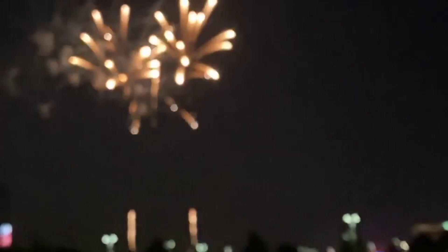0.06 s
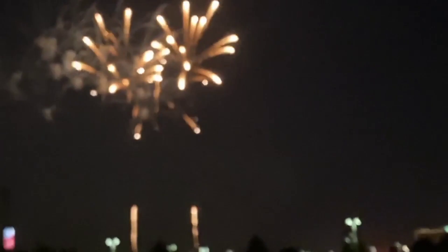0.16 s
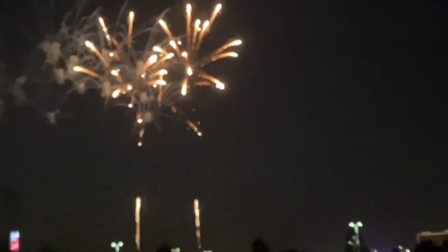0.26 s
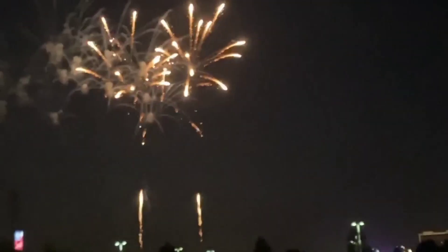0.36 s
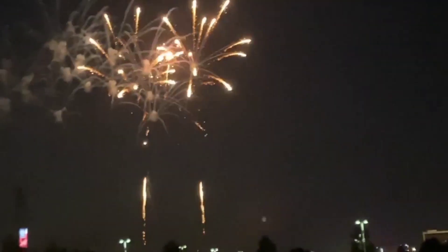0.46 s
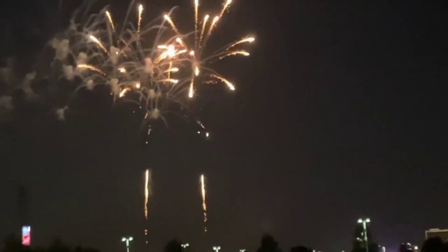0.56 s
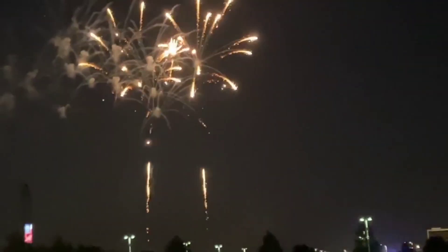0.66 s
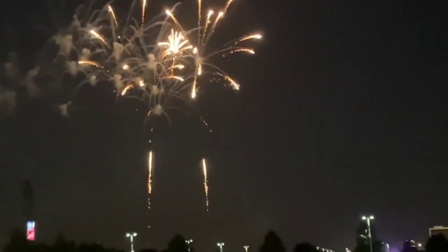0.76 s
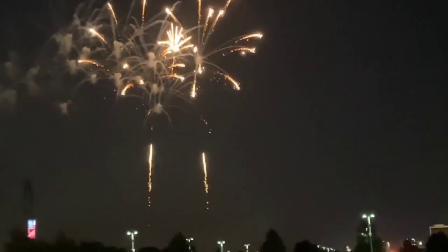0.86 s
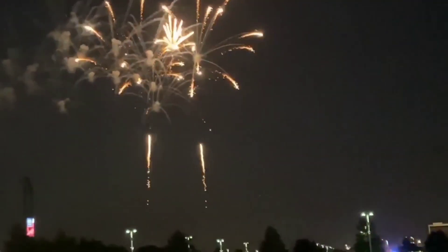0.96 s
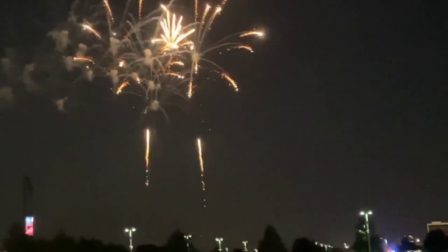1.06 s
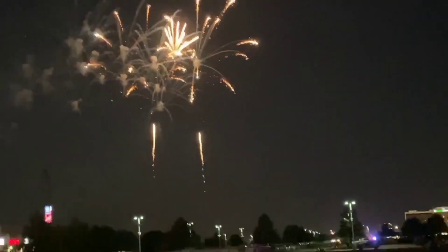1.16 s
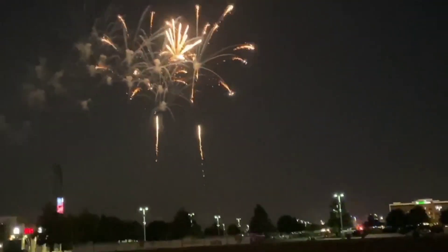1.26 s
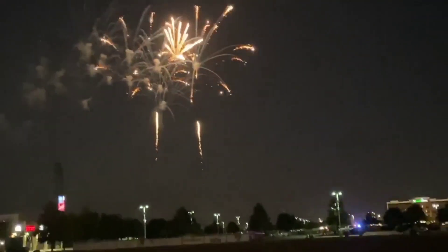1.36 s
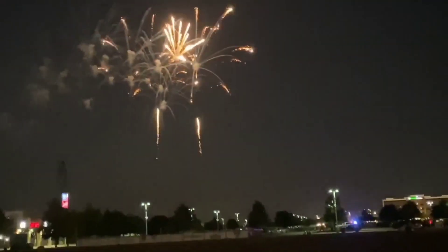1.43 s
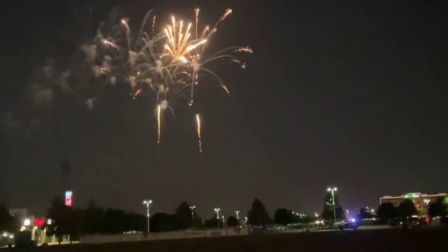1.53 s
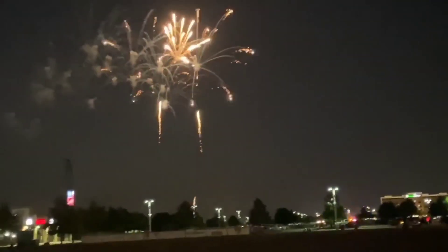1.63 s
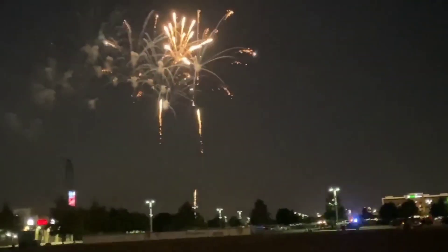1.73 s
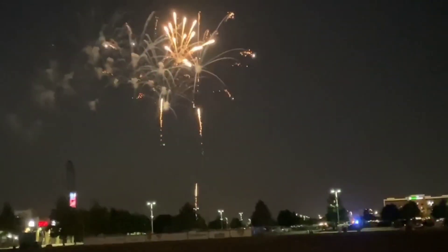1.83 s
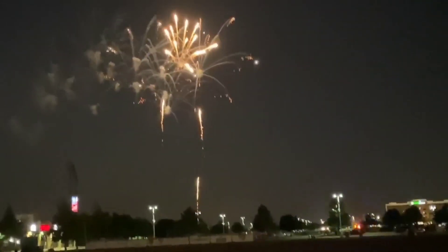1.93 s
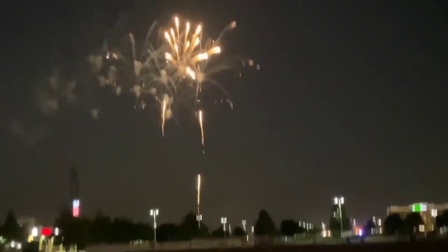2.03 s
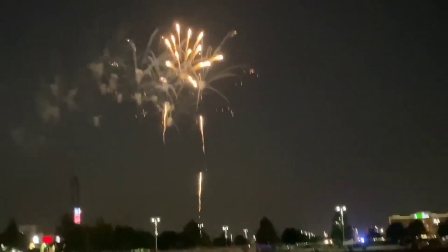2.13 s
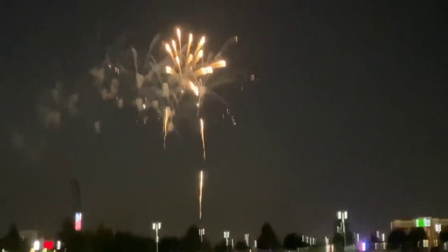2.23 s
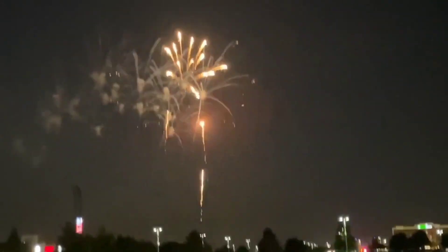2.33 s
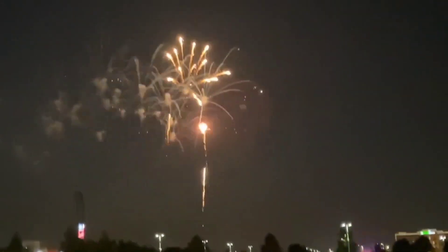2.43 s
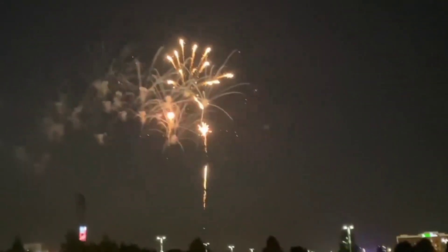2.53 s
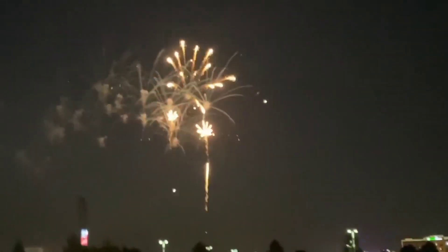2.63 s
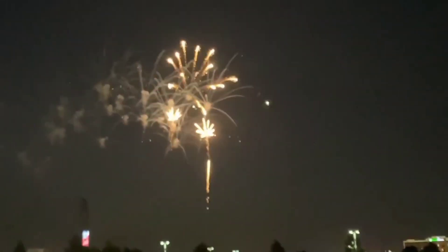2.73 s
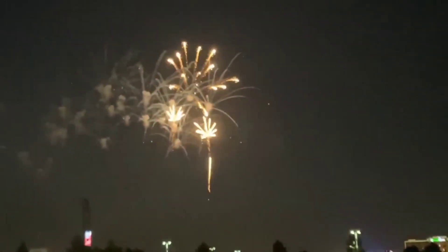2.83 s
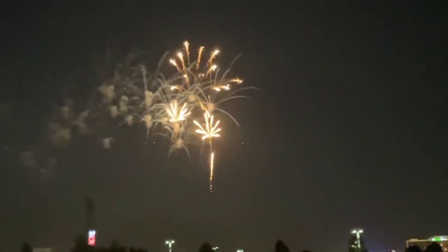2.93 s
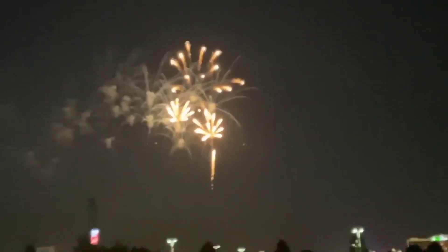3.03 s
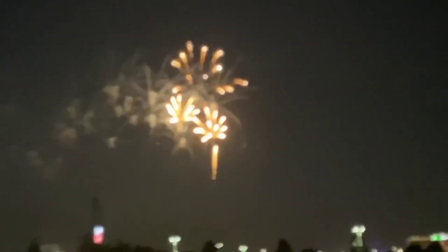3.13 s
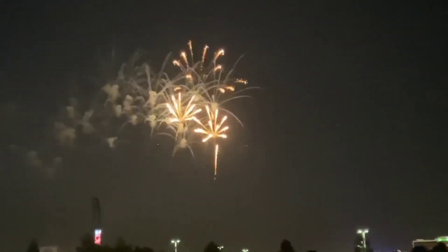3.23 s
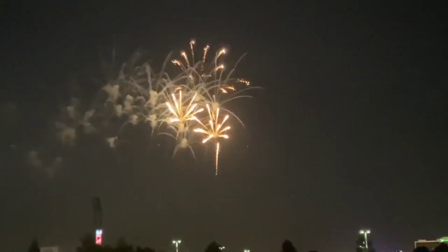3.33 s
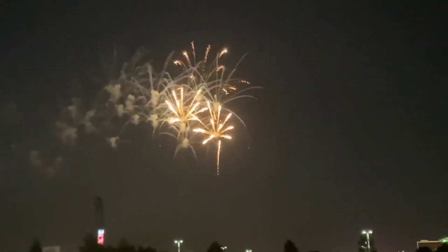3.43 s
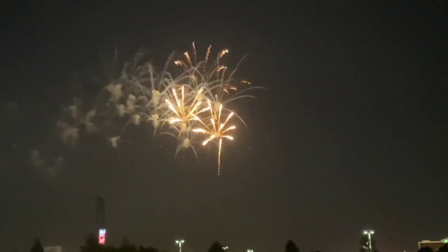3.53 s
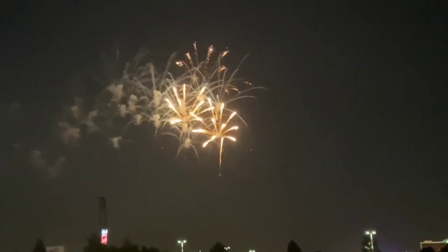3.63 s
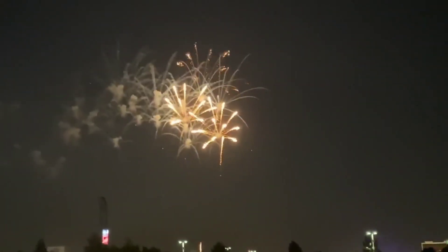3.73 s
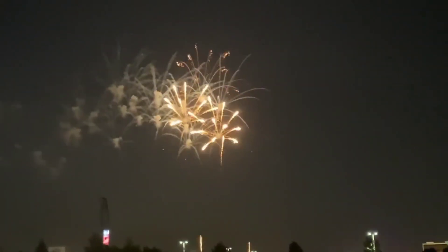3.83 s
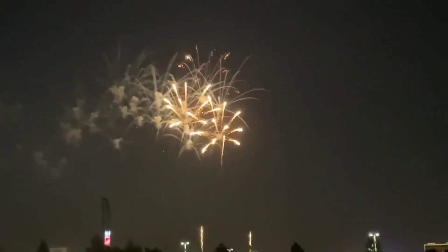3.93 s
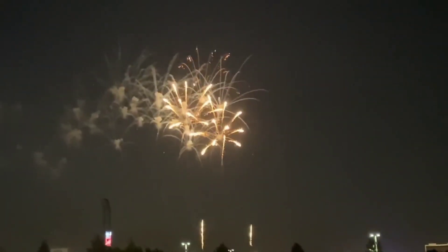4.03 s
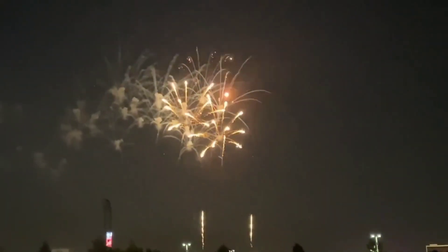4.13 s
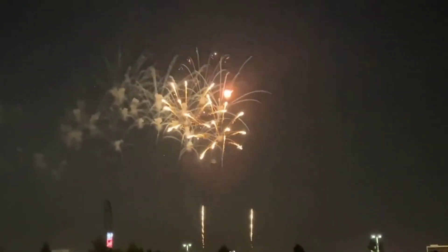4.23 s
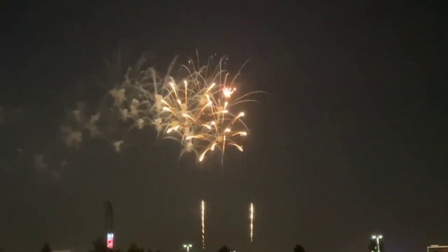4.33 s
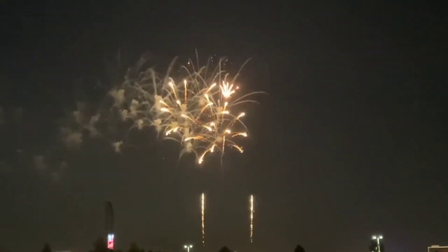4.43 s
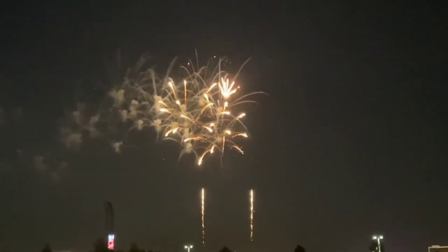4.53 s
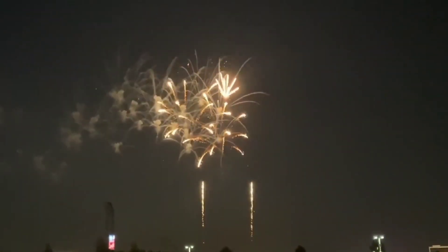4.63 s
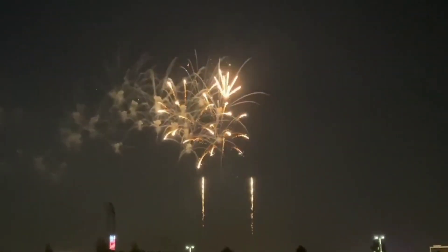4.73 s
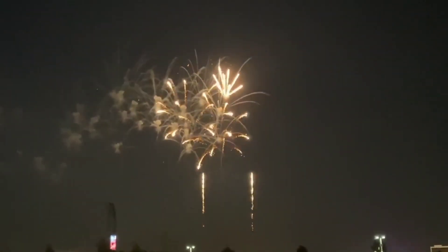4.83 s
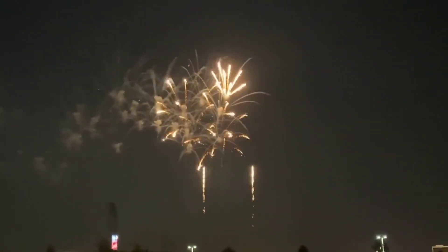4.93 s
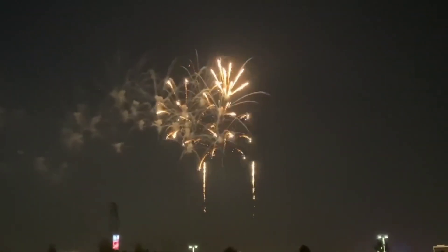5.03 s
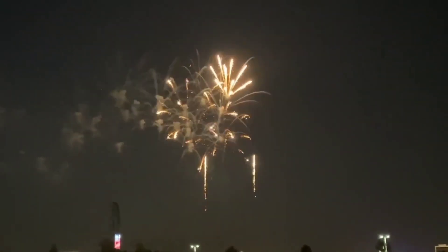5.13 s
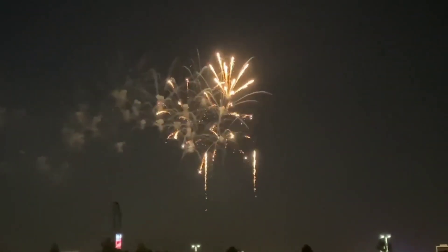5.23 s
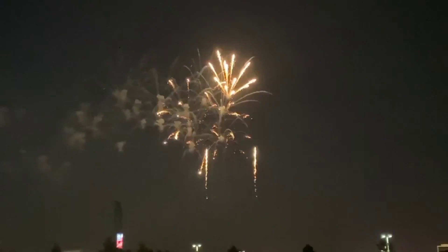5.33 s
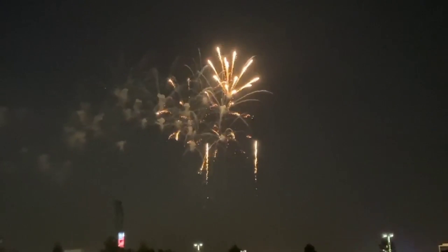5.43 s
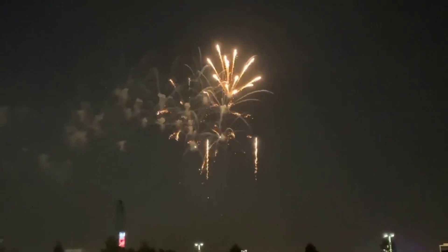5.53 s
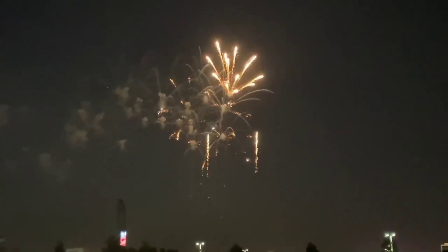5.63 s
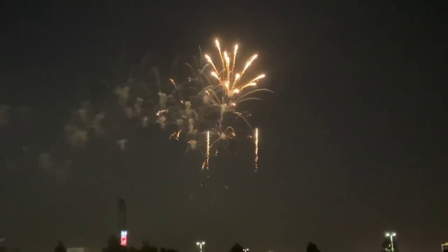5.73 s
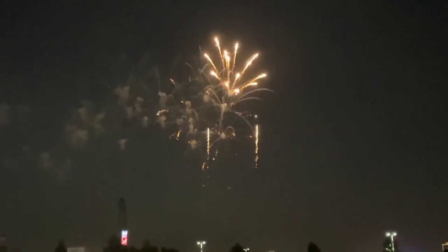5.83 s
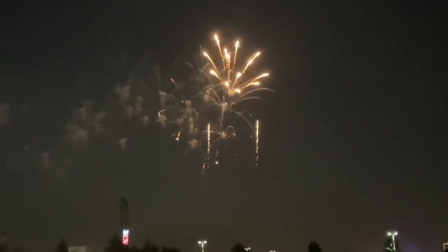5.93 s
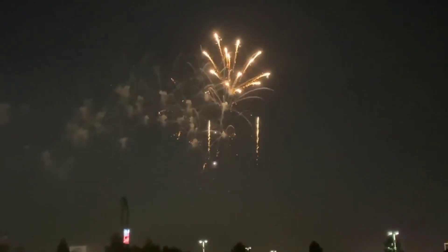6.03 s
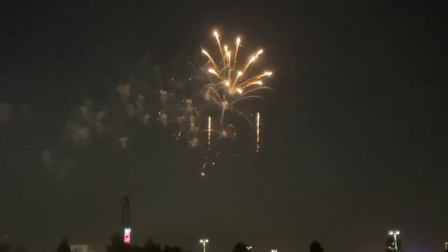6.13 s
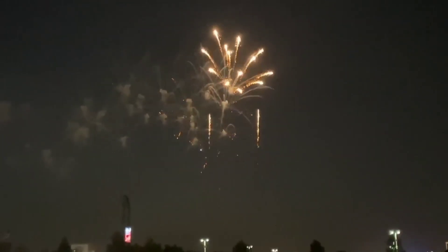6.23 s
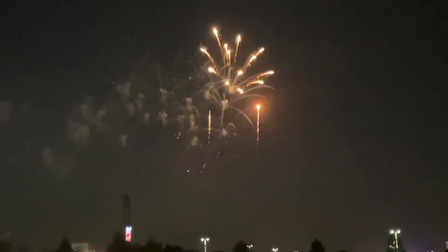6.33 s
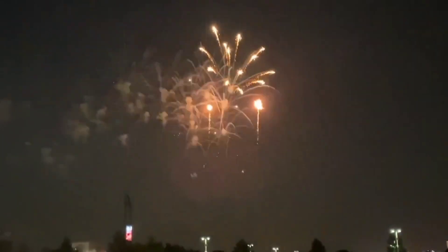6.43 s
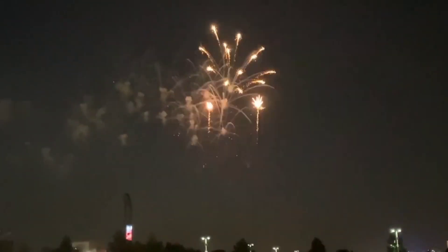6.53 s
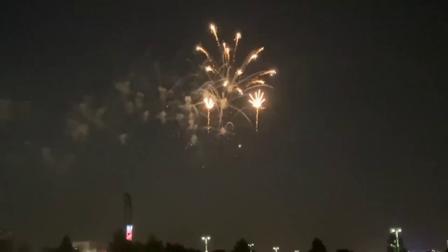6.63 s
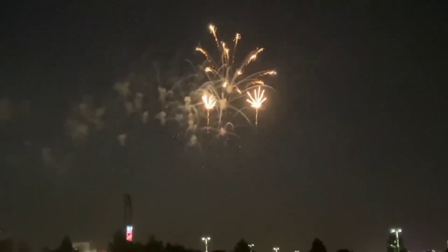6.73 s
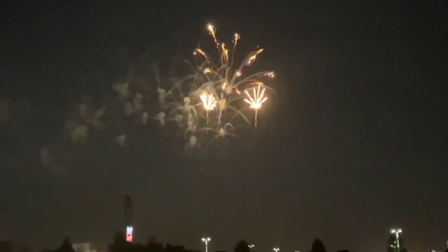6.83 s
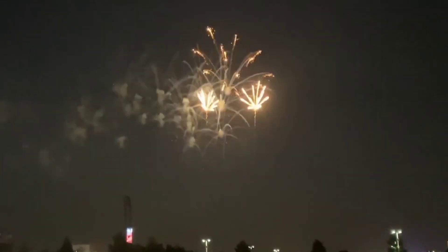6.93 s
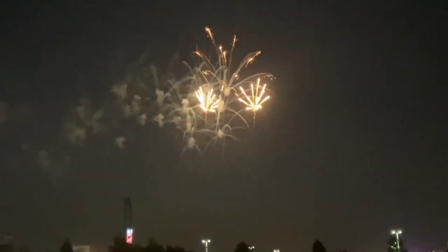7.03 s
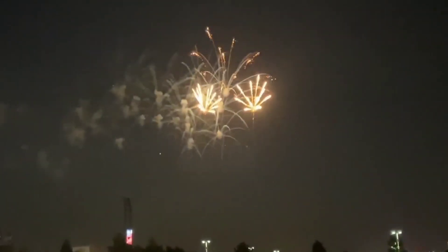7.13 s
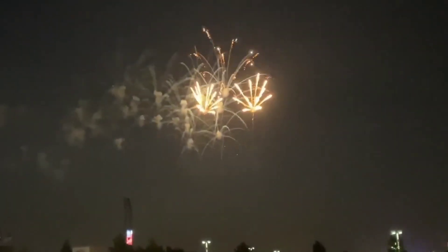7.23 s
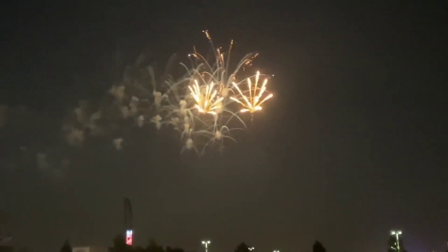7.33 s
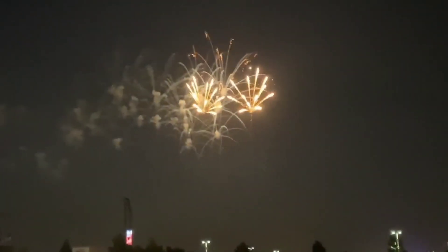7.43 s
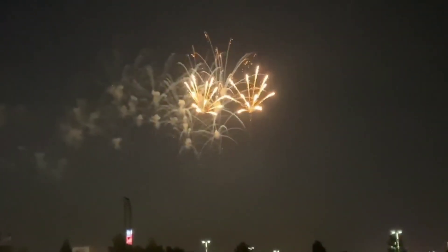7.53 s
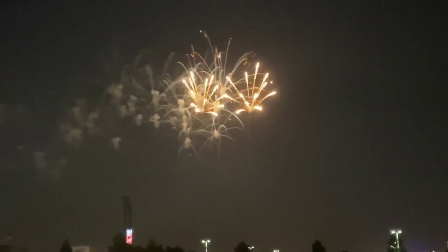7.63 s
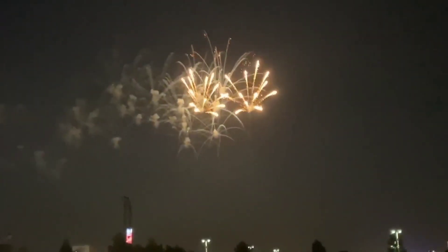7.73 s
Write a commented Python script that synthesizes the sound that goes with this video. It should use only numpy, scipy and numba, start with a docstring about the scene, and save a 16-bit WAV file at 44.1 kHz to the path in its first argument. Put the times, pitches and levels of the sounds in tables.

```python
"""Fireworks a few hundred metres away over open ground at night, heard through a phone.
From the start far traffic roars, earlier shells roll away and older stars hiss, under a thin, very high hiss.
Then pulse-like bangs (from 0.26 s) excite rumble and slap echoes, and each shell's stars flare up and burn out.
Mortars crack and thump (from 1.16 s), comets fizz, stars pop (from 3.9 s), and one faint squeak comes at 6.9 s.
The phone delays the lows of each bang, so it smears downward in pitch, and its limiter ducks the hiss."""
import sys
import numpy as np
from scipy import signal
from scipy.fft import rfft, irfft, next_fast_len
from scipy.io import wavfile
from scipy.ndimage import uniform_filter1d, minimum_filter1d, map_coordinates
from numba import njit

SR = 44100
rng = np.random.default_rng(int(sys.argv[2]) if len(sys.argv) > 2 else 0)


def dump(signal):
    """Clip the signal to [-1, 1] and save it as 16-bit WAV at the path in sys.argv[1]."""
    limited = np.clip(np.atleast_2d(signal).T, -1, 1)
    pcm = np.round(limited * 32767).astype(np.int16)
    wavfile.write(sys.argv[1], SR, pcm)


N = 342216
TIME = np.arange(N) / SR  # t/s
SIZE = 2 * next_fast_len(N // 2 + SR // 4)  # transform length, padded beyond the scene
HZ = np.arange(SIZE // 2 + 1) * SR / SIZE + 1e-6  # f/Hz, kept above zero

# shell bursts: [t/s, level before shaping/dB, treble tilt/(dB per octave), air cut-off f/Hz,
#   shock-front split/ms, ground bounce delay/ms, bounce level/dB, hollow band f/Hz, hollow depth 0-1,
#   body gain/dB, sub-bass gain/dB, relative rumble level/dB, star hiss level/dB, flare-up time/s,
#   star treble gain/dB]
SHELL_BURSTS = [(0.2622, 14.5, -2, 11100, 0.12, 1.8, -4, 1500, 0.75, -1, 3, 1, -45, 0.95, 7.5),
                (0.449, 14, -2.1, 11000, 0.22, 0.92, -9, 2750, .4, -2, 13, 0.5, -38, 1.37, -1),
                (2.1815, 13, -0.6, 9100, 0.14, 1.8, -5, 1490, 0.65, 1.5, 10.5, -1.5, -40, 1.03, -5),
                (4.032, 12.5, -2, 7000, 0.17, 1.38, -7.5, 860, 0.43, -.5, 4, 0.5, -43, 0.17, 1.5),
                (4.2582, 14.5, -0.5, 7640, 0.2, 0.97, -9.5, 2600, 0.5, -2.5, 9, -1.5, -41, 0.97, -2.5),
                (5.8244, 12.5, -0.9, 8500, 0.086, 2.2, -4.5, 1460, .6, 4.5, 16, 0.5, -34.5, 1.43, 1.5)]
# mortar launches: [t/s, thump peak level/dB, thump lag/s, thump pitch ratio, knock gain/dB,
#   crack level over 10 ms/dB, crack swell/s, crack decay/s, crack tilt/(dB per octave), low ring f/Hz,
#   high ring f/Hz, relative ring level/dB, relative low-resonance level/dB, bounce delay/ms]
MORTAR_LAUNCHES = [(1.164, -7, .003, 1.03, -9, -29.5, .0008, .0028, 0.5, 3270, 4330, 7, -11, 2.3),
                   (1.2444, -3.5, 0.0018, 1.12, 4.5, -29.5, .0015, .005, -.5, 950, 2350, 4, -6, 2.0),
                   (3.056, -4, .0001, 0.92, 9, -27.5, .004, 0.0054, -2.5, 640, 3450, 1, -8, 4.5),
                   (5.1574, -7, .002, 1.03, -2.5, -17, .0024, .003, -.9, 1464, 3530, 15.5, 7, 4.1),
                   (5.2236, -5.5, .0039, .93, -1.5, -18.5, .001, .003, -.3, 610, 2480, 5, 2, 3.1)]
# slap echoes from distant buildings: [delay after burst/s, peak level relative to the rumble column/dB]
BUILDING_SLAPS = [(.19, -22.5), (.68, -24)]
# single slaps from large far fronts, loudest about 0.9 s after a burst: [t/s, peak level/dB]
FAR_SLAPS = [(1.336, -13.5), (2.105, -20), (2.868, -23), (3.062, -19), (4.64, -19.5), (4.927, -15),
             (5.139, -14), (6.49, -18.5), (6.709, -16.5)]
# louder pops of burning stars: [t/s, peak level/dB]
STAR_POPS = [(3.9297, -20.5), (5.3405, -18), (5.4122, -22), (5.4779, -20), (5.601, -24), (6.145, -24),
             (6.997, -23), (7.015, -19), (7.2838, -16), (7.4559, -16), (7.5143, -21)]
# thin, very high hiss: [t/s, level/dB]
HIGH_HISS_LEVEL = [(.1, -65), (.65, -70), (.85, -84), (1.04, -84), (1.11, -68), (1.2, -84), (1.45, -80),
                   (1.65, -105)]
# detours of the hiss, shifting as the phone is moved:
#   [t/s, ground bounce delay/ms, near bounce delay/ms, near bounce level/dB]
HISS_DETOURS = [(0, 1.92, 1.2, -24), (1.2, 1.98, 1.21, -16), (1.8, 2.22, 1.25, -17), (2.4, 2.13, 1.22, -28),
                (3.1, 1.92, 1.1, -30), (3.9, 2.02, 1.4, -28.5), (4.7, 2.26, 1.5, -21.5),
                (5.5, 2.24, 1.6, -20), (5.9, 2.26, 1.44, -19), (6.6, 2.05, 1.42, -28),
                (7.2, 2.13, 1.4, -26), (7.7, 2.02, 1.4, -26)]
# two low knocking resonances in the crack: [f/Hz, width/Hz, relative level/dB]
CRACK_MODES = [(730, 110, -5), (980, 110, -0.5)]

# spectrum of far traffic: [f/Hz, level/dB]
TOWN_SPECTRUM = [(20, -22), (35, -8.5), (55, 2.5), (85, 5.5), (125, -0.5), (200, -7), (300, -13),
                 (400, -11.5), (620, -11), (850, -19.5), (1200, -21), (3000, -39), (8000, -79)]
# spectrum of the rolling rumble: [f/Hz, level/dB]
RUMBLE_SPECTRUM = [(25, -21.5), (55, -6), (85, 1.5), (130, 0), (190, -2.5), (300, -18), (600, -28),
                   (1500, -45.5), (5000, -72)]
# spectrum of slaps and near echoes: [f/Hz, level/dB]
SLAP_SPECTRUM = [(40, -26), (100, -5.5), (190, 0.5), (260, -8), (400, -26), (1500, -38), (5000, -80.5)]
# spectrum of burning stars: [f/Hz, level/dB]
HISS_SPECTRUM = [(260, -18.5), (400, 1), (620, -2), (780, -3.5), (990, 3), (1150, -3), (1500, 1.5),
                 (1880, 1.5), (2100, 2), (3400, -3), (4300, -8), (5500, -13), (6800, -21), (7800, -32),
                 (8700, -58), (14000, -86.5)]
# spectrum of the burst pulse: [f/Hz, level/dB]
BURST_SPECTRUM = [(25, -9.5), (50, -24), (80, 2), (145, 2.5), (270, -8), (450, -5), (750, -13.5),
                  (1200, -20), (2000, -20.5), (4200, -31), (6500, -35), (9000, -46), (11500, -50.5),
                  (14000, -80)]
# spectrum of reflections near the listener: [f/Hz, level/dB]
SCATTER_SPECTRUM = [(300, -23.5), (700, -4.5), (1500, 3.5), (2000, -4.5), (2800, -3), (4400, -8.5),
                    (6500, -13.5), (9000, -21), (11500, -35), (14000, -62)]
# spectrum of the muzzle crack: [f/Hz, level/dB]
CRACK_SPECTRUM = [(150, -31), (350, -14.5), (700, 0), (1500, -3), (3500, -5), (7100, -15.5), (9000, -54),
                  (14000, -62)]
# spectrum of the launch thump before its pitch ratio: [f/Hz, level/dB]
THUMP_SPECTRUM = [(25, -22.5), (50, -5.5), (85, 6.5), (130, -7), (200, -12.5), (320, -33), (1000, -54.5),
                  (4000, -98.5)]
# width of diffuse sound between the two ports: [f/Hz, side minus mid level/dB]
DIFFUSE_WIDTH = [(60, -22), (110, -22.5), (200, -12.5), (360, -10), (650, -8.5), (1200, -3), (1850, -10.5),
                 (2200, -43), (3000, -59.5), (7000, -26)]
# colour of the ports: [f/Hz, left against their mean level/dB]
PORT_BALANCE = [(60, -.4), (110, -0.4), (200, -0.4), (400, -0.3), (700, 1), (1200, 1.5), (2200, -0.42),
                (3800, 0)]
# the phone's band-splitting filters: [f/Hz, Q]
PHONE_CROSSOVERS = [(110, 0.68), (240, 0.76), (580, 0.58)]

CEILING_DB, TOP_HZ = -0.6, 13000  # limiter ceiling and upper edge of the phone's band
STAR_FADE_DB_PER_S = 5  # once a shell's stars are fully alight
EMBERS_DB, EMBERS_TREBLE_DB = -40.5, 1.4  # steady hiss of older stars
COMET_DB, COMET_FADE_S = -36, 0.073  # fizz of a comet at launch


def undb(db):
    """Amplitude gain from a level in decibels."""
    return 10 ** (np.asarray(db) / 20)


def shape(points):
    """Spectral envelope: decibels interpolated along logarithmic frequency."""
    hz, db = np.transpose(points)
    return undb(np.interp(np.log(HZ), np.log(hz), db))


def causal(gain):
    """Minimum phase: folding the cepstrum gives the most compact causal response of this gain."""
    cepstrum = irfft(np.log(gain), SIZE)
    cepstrum[1:SIZE // 2] *= 2
    cepstrum[SIZE // 2 + 1:] = 0
    return np.exp(rfft(cepstrum))


def filtered(x, response):
    """Linear filtering: multiply the spectrum by a frequency response."""
    return irfft(rfft(x, SIZE) * response, SIZE)[..., :N]


def mode(hz, width_hz):
    """Simple resonance with unit gain at its centre."""
    return 1 / (1 + 1j * hz / width_hz * (HZ / hz - hz / HZ))


def delayed(delay_ms):
    """Pure delay: a phase lag proportional to frequency."""
    return np.exp(-2j * np.pi * HZ * delay_ms / 1000)


def add(out, x, s):
    """Superposition: mix a sound in from time s."""
    start = int(s * SR)
    out[..., start:] += x[..., :N - start]


def peak(x, db):
    """Normalisation to a peak level."""
    return x * undb(db) / np.abs(x).max()


def walk(rate):
    """Slow random fluctuation: levels held 1 / rate seconds, smoothed twice; spread near 1."""
    hold = int(SR / rate)
    steps = np.repeat(rng.standard_normal(N // hold + 1), hold)
    smooth = uniform_filter1d(uniform_filter1d(steps, hold), hold)
    return 1.7 * smooth[:N]


def diffuse(colour):
    """Diffuse field: independent mid and side noise, with mid rms 1 and the bass alike in both ports."""
    mid = filtered(rng.standard_normal(N), shape(colour))
    side = filtered(rng.standard_normal(N), shape(colour) * shape(DIFFUSE_WIDTH))
    return np.array([mid + side, mid - side]) / mid.std()


def town(level_db=-32.5, swell_db=0.25):
    """Incoherent addition of far traffic: a low, slowly swelling roar of noise."""
    return diffuse(TOWN_SPECTRUM) * undb(level_db + swell_db * walk(4))


def echoes(rumble_db=-31.5, hold_s=1.0, fade_db_per_s=17, sag_db_per_s=2, uneven_db=1.13,
           near_db=-17.5, near_s=0.088, earlier_db=-31, earlier_s=0.45):
    """Scattering: trees and houses turn bangs into rumble, near ones at once; large fronts reflect slaps."""
    rise = 1 - np.exp(-TIME / 0.0081)
    roll_db = -sag_db_per_s * TIME - fade_db_per_s * np.maximum(TIME - hold_s, 0)
    roll = rise * undb(roll_db)
    slap = irfft(causal(shape(SLAP_SPECTRUM)), SIZE)
    power, near, slaps = np.zeros((3, N))
    # earlier shells are still rolling away
    add(power, (undb(earlier_db - rumble_db) * np.exp(-TIME / earlier_s)) ** 2, 0)
    for burst in SHELL_BURSTS:
        s, relative_db = burst[0], burst[11]
        add(power, (undb(relative_db) * roll) ** 2, s)
        add(near, undb(near_db) * rise * np.exp(-TIME / near_s), s)
        for delay_s, slap_db in BUILDING_SLAPS:
            add(slaps, peak(slap, relative_db + slap_db), s + delay_s)
    for s, db in FAR_SLAPS:
        add(slaps, peak(slap, db), s)
    rumble = diffuse(RUMBLE_SPECTRUM) * np.sqrt(power) * undb(rumble_db + uneven_db * walk(25))
    return rumble + near * diffuse(SLAP_SPECTRUM) + slaps


def burning():
    """Addition of powers: embers, flaring and fading stars and launch fizz give hiss level and treble gain."""
    power = np.full(N, undb(EMBERS_DB) ** 2)
    treble = power * undb(EMBERS_TREBLE_DB) ** 2
    for s, *_, hiss_db, flare_s, treble_db in SHELL_BURSTS:
        fade_db = STAR_FADE_DB_PER_S * np.maximum(TIME - flare_s, 0)
        glow = np.minimum(TIME / flare_s, 1) * undb(hiss_db - fade_db)
        add(power, glow ** 2, s)
        add(treble, (glow * undb(treble_db)) ** 2, s)
    fizz = undb(COMET_DB) * np.exp(-TIME / COMET_FADE_S)
    for s, *_ in MORTAR_LAUNCHES:
        add(power, fizz ** 2, s)
        add(treble, fizz ** 2, s)
    return np.sqrt(power), np.sqrt(treble / power)


def combed(x, ground_db=-17):
    """Interference: two short, shifting detours lay a faint moving comb over a sound."""
    s, *columns = np.transpose(HISS_DETOURS)
    ground_ms, near_ms, near_db = (np.interp(TIME, s, column) for column in columns)

    def late(ms):
        """Varying delay, read between samples."""
        return np.array([map_coordinates(port, [(TIME - ms / 1000) * SR], order=1) for port in x])

    return x + undb(ground_db) * late(ground_ms) + undb(near_db) * late(near_ms)


def stars(flutter_db=0.45, flicker_db=1.23, sputter_db=-6, sputter_rate=380, spread_db=4):
    """Combustion noise: hiss plus random tiny pops (sputter_rate per second), flickering band by band."""
    level, bright = burning()
    signs = rng.choice([-1, 1], N)
    sizes = signs * undb(spread_db * np.minimum(rng.exponential(size=N), 4))
    impulses = (rng.random(N) < sputter_rate / SR) * sizes
    sputter = filtered(impulses, shape(HISS_SPECTRUM))
    hiss = diffuse(HISS_SPECTRUM) + undb(sputter_db) * sputter / sputter.std()
    low = filtered(hiss, 1 / (1 + (HZ / 1800) ** 8))
    treble = filtered(hiss, 1 / (1 + (3600 / HZ) ** 6))
    bands = low, hiss - low - treble, treble * bright
    hiss = sum(band * undb(flicker_db * walk(70)) for band in bands)
    return combed(hiss) * level * undb(flutter_db * walk(20))


def high_hiss(hz=11150, width_hz=1100, right_db=-6):
    """Band-limited noise: a thin, very high hiss, a little left, fades, swells briefly and dies away."""
    noise = filtered(rng.standard_normal((2, N)), 1 / (1 + (2 * (HZ - hz) / width_hz) ** 4))
    balance = undb([[0], [right_db]])  # left, right
    return noise / noise.std() * balance * undb(np.interp(TIME, *np.transpose(HIGH_HISS_LEVEL)))


def bursts(lag_ms=0.14, scatter_db=-11.0, scatter_s=0.0047, split_db=-5, dip_width_hz=220,
           body_hz=280, body_width_hz=170, sub_hz=42, sub_width_hz=14):
    """Impulse radiation: a pressure pulse, dulled by air and frayed by reflections near the listener."""
    out = np.zeros((2, N))
    blast = causal(shape(BURST_SPECTRUM))
    blast = -blast / np.abs(irfft(blast, SIZE)).max()
    scatter, short = causal(shape(SCATTER_SPECTRUM)), TIME[:SR // 20]
    octaves = np.log2(1 + HZ / 700)
    # the body of the bang reaches the left port first
    late = delayed(lag_ms / (1 + (HZ / 1700) ** 6))
    body, sub = mode(body_hz, body_width_hz), mode(sub_hz, sub_width_hz)
    for (s, db, tilt_db, air_hz, split_ms, bounce_ms, bounce_db, dip_hz, dip_depth,
         body_db, sub_db, *_) in SHELL_BURSTS:
        # the bounce combs the treble differently for each shot
        bounce = 1 + undb(bounce_db) * delayed(bounce_ms) / (1 + (1200 / HZ) ** 4)
        # uneven air splits the shock front in two, which cuts a wide notch
        split = 1 + undb(split_db) * delayed(split_ms) / (1 + (1800 / HZ) ** 4)
        hollow = 1 - dip_depth * mode(dip_hz, dip_width_hz)
        fuller = 1 + (undb(body_db) - 1) * body
        deeper = 1 + (undb(sub_db) - 1) * np.abs(sub) ** 2
        mid, side = rng.standard_normal((2, len(short))) * np.exp(-short / scatter_s)
        fray = rfft(np.array([mid + .1 * side, mid - .1 * side]) / np.linalg.norm(mid), SIZE)
        fray = fray * scatter * undb(scatter_db) / np.abs(scatter).mean()
        air = undb(db + tilt_db * octaves) / (1 + (HZ / air_hz) ** 6)
        bang = np.array([blast, blast * late]) * bounce * split + fray
        add(out, irfft(bang * hollow * fuller * deeper * air, SIZE), s)
    return out


def launches(ring_width_hz=230, snap_db=-5, knock_hz=180, knock_width_hz=70, bounce_db=-6,
             bounce_hz=1200, tail_db=-34.0, tail_s=0.016, tail_hz=600):
    """Jet noise and resonance: gas spurts, snaps and rings, with a dull bounce, a low thump and a rush."""
    out, flow = np.zeros((2, N))
    lead_s, span_s = .01, .01  # gas before the snap; span over which the crack level holds
    t = TIME[:SR // 10] - lead_s
    air = causal(shape(CRACK_SPECTRUM))
    knocks = sum(undb(db) * mode(hz, width) for hz, width, db in CRACK_MODES)
    rush = filtered(rng.standard_normal(N), mode(tail_hz, tail_hz) ** 2)
    snap, octaves = delayed(1000 * lead_s), np.log2(1 + HZ / 310)
    thump_knock = mode(knock_hz, knock_width_hz)
    dull = undb(bounce_db) / (1 + (HZ / bounce_hz) ** 4)
    for (s, thump_db, lag_s, pitch, knock_db, crack_db, swell_s, decay_s, tilt_db,
         low_hz, high_hz, ring_db, knocks_db, bounce_ms) in MORTAR_LAUNCHES:
        thump = causal(shape([(hz * pitch, db) for hz, db in THUMP_SPECTRUM]))
        thump = thump * (1 + (undb(knock_db) - 1) * thump_knock)
        gas = rng.standard_normal(len(t)) * np.exp(np.minimum(t / swell_s, -t / decay_s))
        # zero phase: the two rings swell up to the snap and die away after it
        rings = sum(np.abs(mode(hz, ring_width_hz)) ** 2 for hz in (low_hz, high_hz))
        ring = undb(ring_db) * rings + undb(knocks_db) * knocks
        crack = rfft(gas / np.linalg.norm(gas), SIZE) + snap * (undb(snap_db) + 2 * ring)
        bounce = 1 + dull * delayed(bounce_ms)
        crack = irfft(crack * bounce * air * undb(tilt_db * octaves), SIZE)
        crack = crack * undb(crack_db) * np.sqrt(span_s * SR) / np.linalg.norm(crack)
        add(out, crack, s - lead_s)
        add(out, peak(irfft(thump, SIZE), thump_db), s + lag_s)
        add(flow, 2 * (1 - np.exp(-TIME / 0.0045)) * np.exp(-TIME / tail_s), s)
    return out + undb(tail_db) * flow * rush / rush.std()


def pops(decay_s=0.00059):
    """Impulsive combustion: now and then a star snaps above the hiss, as a decaying noise burst."""
    out = np.zeros(N)
    burst = rng.standard_normal(N) * np.exp(-TIME / decay_s)
    snap = filtered(burst, causal(shape(HISS_SPECTRUM)))
    for s, db in STAR_POPS:
        add(out, peak(snap, db), s)
    return out


def squeak(s=6.935, hz=10600, level_db=-47, length_s=0.013):
    """Frequency modulation: one faint, very high tone wavers as it swells and dies exponentially."""
    phase = 2 * np.pi * np.cumsum(hz + 30 * walk(100)) / SR
    return undb(level_db) * np.exp(-np.abs(TIME - s) / length_s) * np.sin(phase)


def scene():
    """Superposition of everything that reaches the two ports."""
    return town() + echoes() + stars() + high_hiss() + bursts() + launches() + pops() + squeak()


@njit
def limiter_cut(over_db, hold, release):
    """Peak limiting: the cut in dB jumps to each overshoot, holds, then decays (times in samples)."""
    out, cut, wait = np.empty(len(over_db)), 0., 0.
    for i in range(len(over_db)):
        wait -= 1
        if over_db[i] > cut:
            cut, wait = over_db[i], hold
        elif wait < 0:
            cut -= cut / release
        out[i] = cut
    return out


def record(dry, hold_s=0.11, release_s=0.018, start_s=.096):
    """Dispersion and limiting: the phone delays lows in its crossovers, limits bangs and cuts the top."""
    smear = 1
    for hz, q in PHONE_CROSSOVERS:
        pole = 1 - (HZ / hz) ** 2 + 1j * HZ / hz / q
        smear = smear * np.conj(pole) / pole  # all-pass
    left = shape(PORT_BALANCE)
    x = filtered(dry, smear * np.array([left, 1 / left]))
    over_db = 20 * np.log10(np.abs(x).max(axis=0) + 1e-9) - CEILING_DB
    cut_db = limiter_cut(over_db, float(hold_s * SR), float(release_s * SR))
    # the limiter looks a few milliseconds ahead
    x = x * undb(uniform_filter1d(minimum_filter1d(-cut_db, size=260), size=260))
    # the input opens a moment after the start
    x = x * np.clip((TIME - start_s) / 0.00079, 0, 1)
    return signal.sosfilt(signal.ellip(8, .2, 70, TOP_HZ, fs=SR, output="sos"), x)


dry = scene()
out = record(dry)
dump(out)
```